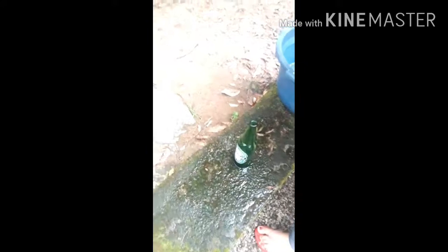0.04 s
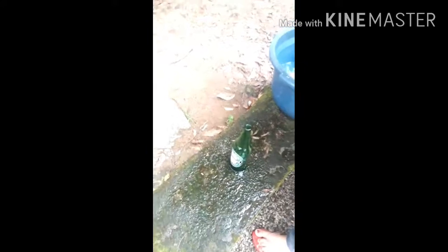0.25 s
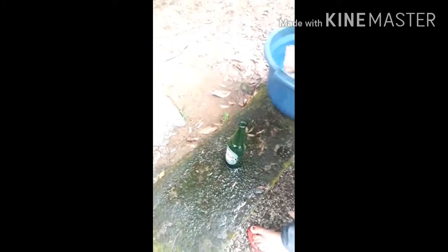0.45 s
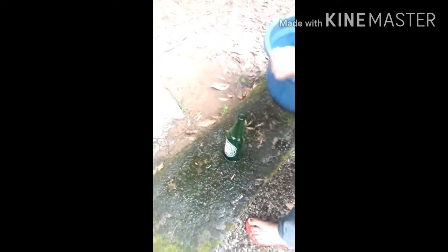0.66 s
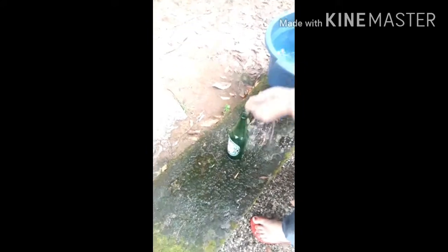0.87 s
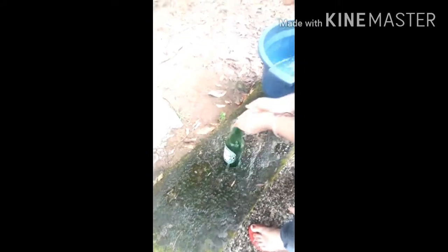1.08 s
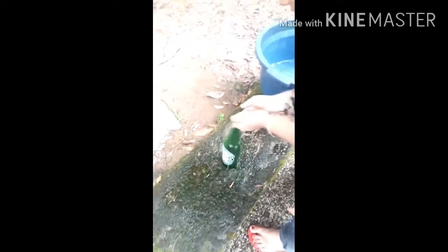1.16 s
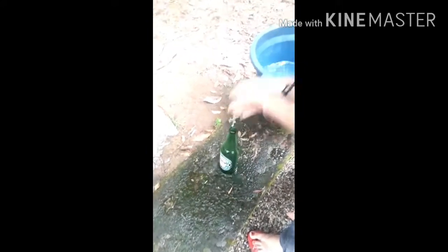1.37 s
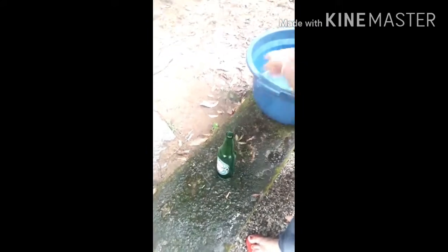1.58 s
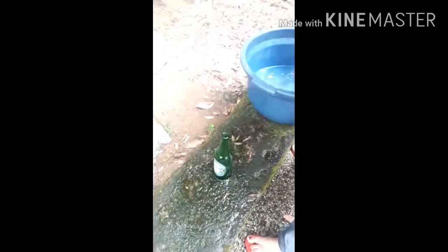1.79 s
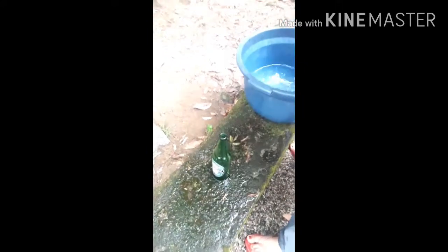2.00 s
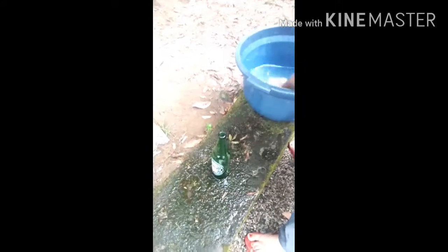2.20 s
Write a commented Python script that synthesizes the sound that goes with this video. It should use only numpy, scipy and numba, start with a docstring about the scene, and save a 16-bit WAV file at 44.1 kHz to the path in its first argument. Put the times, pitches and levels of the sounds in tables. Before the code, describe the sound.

Handfuls of water scooped from a plastic bucket and spilled in crackling splats on wet concrete

```python
"""Scooping and spilling water

Cupped hands scoop water from a plastic bucket, carry it over a bottle and let it spill on wet concrete outdoors.
Drops splat with a crack, a burst of noise for spray and rising rings; bubbles are rising, fading tones.
Sloshing and trickling are crowds of tiny rings over hiss. Behind: shaped noise for rumble, air and an insect,
a wavering low hum and a soft low swell. Both channels share one sound, with a faint flutter between them."""
import sys
import numpy as np
from scipy import signal
from scipy.fft import rfft, irfft
from scipy.io import wavfile
from scipy.ndimage import uniform_filter1d
from numba import njit

SR = 44100
rng = np.random.default_rng(int(sys.argv[2]) if len(sys.argv) > 2 else 0)


def natural_amplitude(level_db):
    """Convert a level in decibels to a linear amplitude factor, elementwise."""
    exponent = np.asarray(level_db, float) / 20
    return 10 ** exponent


def log_audio(samples):
    """Write samples as a 16-bit WAV file to the path given in sys.argv[1]."""
    # one column per channel
    frames = np.atleast_2d(samples).T
    # limit to full scale, then quantise
    limited = np.clip(frames, -1, 1)
    pcm = np.round(limited * 32767).astype(np.int16)
    wavfile.write(sys.argv[1], SR, pcm)


N = 99225  # length [samples]

# Drops bursting on the wet ground and in the bucket:
# (time [s], level [dB], centre pitch [Hz], spray fade by 60 dB [s], width [octaves], crack against level [dB])
SPLAT_DROPS = [(0.3221, -29, 8100, 0.02, 0.66, 1), (0.3428, -33, 3240, 0.0092, 2.4, -13),
               (0.4407, -36.5, 4170, 0.031, 1.8, -22), (0.516, -29, 3200, 0.016, 0.14, -12),
               (0.6229, -24, 2640, 0.018, 0.64, -19), (0.6784, -32.5, 3920, 0.016, 0.89, -29),
               (0.8, -35, 5270, 0.0062, 0.6, -2), (0.8305, -25, 7840, 0.014, 0.97, -11),
               (0.8393, -24.5, 8850, 0.014, 0.9, -16), (0.853, -31.5, 7200, 0.0097, 0.41, -12),
               (0.864, -34, 12600, 0.015, 0.6, -10), (0.8843, -27, 8040, 0.008, 0.35, -10),
               (0.868, -23, 11000, 0.016, 1.8, -12), (0.8866, -20.5, 7370, 0.011, 1.67, -17),
               (0.9062, -25, 8800, 0.013, 0.6, -0.5), (0.927, -21.5, 5300, 0.026, 1.8, -5),
               (0.969, -37, 8060, 0.0077, 1.5, -7), (0.9805, -36, 11000, 0.01, 1.5, -9),
               (0.9915, -33, 7700, 0.024, 2.9, -6), (0.998, -29, 12000, 0.015, 3.7, -12),
               (1.0177, -32, 12700, 0.013, 0.39, -8), (1.0836, -31.5, 11500, 0.008, 0.85, -2),
               (1.0943, -35, 6860, 0.0082, 0.5, -9), (1.0942, -39, 14600, 0.006, 0.25, -7),
               (1.1055, -44, 11500, 0.006, 0.8, -6), (1.123, -45, 5560, 0.016, 0.8, -14),
               (1.1295, -39, 12900, 0.007, 0.6, -6), (1.1465, -41.5, 9000, 0.014, 1, -8),
               (1.1325, -38, 6940, 0.0097, 0.49, -6), (1.1575, -46, 13500, 0.007, 0.5, -10),
               (1.1615, -34, 7560, 0.0059, 1.1, -2), (1.1757, -30.5, 8370, 0.007, 1.02, -4),
               (1.191, -40, 5900, 0.01, 1.5, -9), (1.201, -36, 11100, 0.006, 0.97, 1),
               (1.2044, -32, 8300, 0.0082, 1.1, -7), (1.2133, -23, 5300, 0.0083, 1.22, 2),
               (1.249, -22.5, 7100, 0.012, 1.2, -17), (1.256, -39, 4640, 0.0086, 1, -12),
               (1.303, -26.5, 8460, 0.014, 2.4, -15), (1.3238, -33.5, 8200, 0.013, 0.8, -18),
               (1.407, -32, 9850, 0.015, 1.15, -23), (1.436, -35, 9900, 0.013, 1.4, -11),
               (1.6675, -24.5, 6670, 0.014, 0.3, 0.5), (1.7172, -50, 8150, 0.0095, 1.2, -9),
               (1.7275, -45, 8950, 0.014, 1.6, 0), (1.736, -49, 8730, 0.013, 1.1, -9),
               (1.7442, -37.5, 10500, 0.007, 0.57, -1), (1.767, -51, 13200, 0.014, 0.28, -12),
               (1.7838, -49, 13500, 0.014, 0.4, -12), (1.8244, -27.5, 7540, 0.0074, 0.45, -9),
               (1.8385, -48, 8600, 0.01, 0.23, -12), (1.852, -44.5, 12500, 0.011, 0.7, -6),
               (1.8617, -40, 6560, 0.012, 0.9, 1), (1.9, -38.5, 8700, 0.019, 0.33, -8),
               (1.9246, -26, 8400, 0.0037, 0.29, -9), (1.953, -38, 9000, 0.025, 1.8, -12),
               (1.978, -32.5, 3200, 0.012, 0.42, -1.5), (1.984, -30.5, 9000, 0.012, 0.37, -15),
               (1.9918, -26, 8500, 0.0093, 1, 1), (2.0532, -39.5, 3680, 0.013, 2.1, -5),
               (2.1834, -45, 9000, 0.0082, 0.21, -7), (2.2315, -33, 7400, 0.017, 0.85, -21),
               (.872, -26, 4500, 0.011, 1.7, -4), (0.9516, -15.5, 5380, 0.0057, 1.34, 9),
               (0.9616, -22, 6700, 0.015, 0.51, 4.5), (1.2359, -20.5, 7500, 0.0084, 1.18, 6.5),
               (0.945, -39, 7950, 0.012, 0.44, -15), (1.2314, -24, 10900, 0.007, 0.84, -14),
               (1.266, -33, 11500, 0.012, 0.79, -10), (.615, -35, 13700, 0.01, 0.13, -20),
               (.615, -32.5, 9200, 0.022, 0.12, -22), (1.755, -39, 9900, 0.0094, 0.6, -8),
               (1.2725, -35, 13700, 0.0056, .6, -5)]
# Single bubbles closing under water:
# (time [s], level [dB], starting pitch [Hz], fade by 60 dB [s], pitch rise during the fade [share])
SINGLE_BUBBLES = [(0.125, -40, 2584, 0.033, 0.18), (.187, -38, 857, 0.072, 0.023),
                  (0.232, -33, 1453, 0.024, 0.083), (0.234, -34, 855, 0.055, 0.013),
                  (0.261, -22.5, 3296, 0.015, 0.035), (.264, -37.5, 866, 0.051, 0.066),
                  (0.308, -44, 3420, 0.11, 0.15), (.320, -36.5, 1353, 0.031, 0.071),
                  (0.348, -36, 2450, 0.021, 0.14), (.365, -44.5, 1450, 0.055, 0.051),
                  (0.459, -31.5, 3030, 0.022, 0.055), (0.462, -35.5, 1174, 0.029, 0.22),
                  (0.475, -32.5, 2604, 0.026, .03), (.522, -41.5, 925, 0.051, 0.034),
                  (.552, -39, 885, .06, 0.019), (.581, -27.5, 3000, 0.011, 0.086),
                  (0.605, -36.5, 3080, 0.022, 0.056), (0.6226, -26, 2300, 0.021, 0.39),
                  (0.8719, -27, 2970, 0.01, 0.059), (0.887, -30.5, 3000, 0.013, 0.081),
                  (0.9525, -23, 3120, 0.0126, 0.1), (1.039, -42.5, 2600, 0.013, 0.13),
                  (1.289, -27.5, 1940, 0.016, 0.65), (1.303, -32.5, 2650, 0.014, 0.18),
                  (1.773, -45.5, 5550, 0.011, 0.029), (1.874, -45.5, 3200, 0.0131, 0.09),
                  (1.91, -50, 1067, 0.053, 0.089), (1.932, -36.5, 1012, 0.035, 0.092),
                  (1.964, -46, 3570, 0.036, .02), (1.909, -48, 914, 0.028, 0.13),
                  (1.977, -38, 614, 0.07, 0.01), (2.03, -39.5, 3350, 0.019, 0.084),
                  (2.042, -39.5, 2880, .015, 0.78), (2.041, -51, 780, 0.04, 0.088),
                  (2.062, -54.5, 640, 0.074, 0.056), (2.051, -34.5, 3850, 0.019, 0.059),
                  (2.176, -50.5, 4100, 0.018, 0.072), (2.178, -54, 2010, 0.03, 0.028)]
# Four sizes of tiny ring in the flowing water, from gurgle to fine spray:
# (lowest pitch [Hz], highest pitch [Hz], rate [per s], ring length [2.3 cycles], loudness scatter [dB], trim [dB])
FLOW_GRAINS = [(229, 610, 150, 8.2, -1, -18), (640, 2310, 600, 13.7, 4, -3),
               (2345, 4620, 1200, 9.6, 3.5, -5), (4500, 14500, 3500, 14.4, 5, -2)]
# Sloshing in the bucket, in several stretches:
# (time [s], large bubbles [dB], small bubbles [dB], fine spray [dB])
SLOSH_LEVELS = [
    [(0.0, -56, -49, -56.5), (0.092, -69, -61, -67), (0.244, -51.5, -43.5, -51), (0.266, -59.5, -43.5, -49),
     (0.292, -50.5, -48.5, -58), (0.326, -48, -43.5, -46.5), (0.41, -50, -50.5, -50.5)],
    [(0.432, -53, -57, -53.5), (0.445, -54.5, -45, -45), (0.47, -42, -42.5, -49), (0.564, -51, -45, -49.5),
     (0.612, -52, -48, -50), (0.656, -59.5, -53.5, -55), (0.69, -58, -51, -60), (0.76, -78.5, -63, -66.5)],
    [(1.84, -81, -103, -76), (1.882, -84, -61, -53.5), (1.932, -56, -53, -58.5), (1.962, -53, -66, -61.5),
     (1.982, -46.5, -45, -51), (2.02, -70, -54, -50), (2.044, -62, -54, -58.5), (2.144, -69.5, -71, -80),
     (2.21, -66, -70, -77)],
    [(2.222, -55, -70, -76), (2.232, -62.5, -44.5, -57), (2.25, -47, -44, -52)],
]
# Trickling on the ground: (time [s], large bubbles [dB], small bubbles [dB], fine spray [dB])
TRICKLE_LEVELS = [(0.8, -73.5, -62, -64.5), (0.924, -71, -49, -51), (1.02, -77, -55.5, -56.5),
                  (1.104, -71, -67.5, -61), (1.216, -76, -57.5, -63), (1.284, -66.5, -46.5, -50),
                  (1.396, -73.5, -61, -61), (1.466, -91, -71.5, -71), (1.648, -80, -75, -78),
                  (1.756, -77.5, -72, -66.5), (1.82, -87, -87, -77)]
# Tone colour of rumble and air hiss: (frequency [Hz], relative level [dB])
AIR_COLOUR = [(45, -36), (65, -3), (135, 1.5), (280, -9.5), (480, -27), (1000, -30.5), (3500, -31),
              (7500, -23), (9300, -21), (10500, -35.5), (16000, -37)]
# Slow change in the hum: (time [s], level change [dB])
HUM_CHANGE = [(0, -9.5), (.95, 4.5), (2.25, -3.5)]
# Soft low swells far off: (time [s], level [dB], starting pitch [Hz], fade by 60 dB [s])
FAR_SWELLS = [(1.359, -51, 182.4, 0.22)]
# Loudness of the insect: (time [s], level [dB])
INSECT_LEVEL = [(0, -74), (1.4, -120), (1.5, -99), (1.56, -68.5), (1.64, -73.5), (1.799, -89), (2.25, -88)]

SPLAT_DELAY_S = 0.0008  # spray and ring start this long after the splat's listed time
SKIRT_HZ = 2600  # splats thin out below this pitch
GLIDE = 0.12  # pitch rise of flow grains and droplets [share]


@njit
def ring(out, start, hz, t60, size, rise, attack):
    """Damped sines, like small resonances, that climb in pitch as they fade."""
    for k in range(len(start)):
        length = int(t60[k] * SR)
        phase = 0.
        for i in range(min(length, len(out) - start[k])):
            u = i / length
            pitch = min(hz[k] * (1 + rise[k] * u), .45 * SR)
            phase += 2 * np.pi * pitch / SR
            fade = np.exp(-6.9 * u)  # 60 dB down at the end
            swell = 1 - np.exp(-i / (attack[k] * SR))
            out[start[k] + i] += size[k] * np.sin(phase) * fade * swell
    return out


def rings(t, hz, t60, size, rise, attack):
    """Adds many damped, climbing tones into a fresh track."""
    rise = np.zeros(len(t)) + rise
    attack = np.zeros(len(t)) + attack
    start = (t * SR).astype(np.int64)
    return ring(np.zeros(N), start, hz, t60 + 1e-4, size, rise, attack + 1e-5)


def unit(x):
    """Scales a sound to an average (rms) strength of 1."""
    return x / np.sqrt(np.mean(x ** 2))


def shaped(n, gain):
    """Noise coloured by a gain for each frequency, with rms 1."""
    f = np.arange(n // 2 + 1) * SR / n + 1
    return unit(irfft(rfft(rng.standard_normal(n)) * gain(f), n))


def walk(rate):
    """Random wander: rate new levels per second, smoothed twice."""
    hold = int(SR / rate)
    steps = np.repeat(rng.standard_normal(N // hold + 1), hold)
    return 2.07 * uniform_filter1d(uniform_filter1d(steps, hold), hold)[:N]


def cracks_and_spray():
    """A sharp pressure pulse, then lumpy noise that dies away with a faint longer patter."""
    size = 4096
    clock = np.arange(size) / SR
    t = np.maximum(clock - SPLAT_DELAY_S, 0)
    f = np.arange(size // 2 + 1) * SR / size + 1
    attack = np.minimum(t / .0005, 1)
    patter_fade = natural_amplitude(-22 - 60 * t / 0.056)
    out = np.zeros(N + size)
    for s, db, hz, t60, octaves, crack_db in SPLAT_DROPS:
        def colour(f):
            """A band around the splat's pitch on a weak wide skirt that thins out in the bass."""
            band = np.exp(-2 * (np.log2(f / hz) / octaves) ** 2)
            return (band + natural_amplitude(-24)) / (1 + (SKIRT_HZ / f) ** 4)

        # a pulse centred at 1 ms and about a millisecond long
        pulse = irfft(1j * colour(f) * np.exp(-2j * np.pi * f * .001), size)
        crack = pulse * np.exp(-2 * (clock * 1000 - 1) ** 2)
        crack = natural_amplitude(crack_db) * crack / np.max(crack)
        lumps = np.repeat(rng.standard_normal(size // 32), 32)
        lumpy = natural_amplitude(5 * uniform_filter1d(lumps, 24))
        spray_fade = natural_amplitude(-11 - 60 * t / max(t60, 3e-4))
        spray = lumpy * shaped(size, colour) * (spray_fade + patter_fade)
        i = int(s * SR)
        out[i:i + size] += natural_amplitude(db) * (spray * attack + crack)
    return out[:N]


def droplets():
    """Ten small rings follow each splat, scattered around its pitch; later ones are weaker."""
    s, db, hz, t60, octaves, _ = np.array(SPLAT_DROPS).T[:, :, None]
    late = rng.exponential(size=(len(s), 10)) * t60 / 5
    off = rng.standard_normal((len(s), 10))
    pitch = np.clip(hz * 2 ** (off * octaves / 2), SKIRT_HZ, 15000).ravel()
    level = natural_amplitude(db - 7 - 30 * late / t60).ravel()
    return rings((s + late + 0.001001).ravel(), pitch, 13 / pitch, level, GLIDE, 1 / pitch)


def splat_rings():
    """One short rising ring just below the pitch of each splat."""
    s, db, hz = np.array(SPLAT_DROPS).T[:3]
    t60 = np.full(len(s), .006)
    return rings(s + SPLAT_DELAY_S, hz * .9, t60, natural_amplitude(db - 7), .22, .0006)


def bubbles():
    """Each bubble swells, fades and climbs, roughened by three weaker neighbours."""
    s, db, hz, t60, rise = np.array(SINGLE_BUBBLES).T
    attack = 0.14 * t60
    out = rings(s, hz, t60, 2 * natural_amplitude(db), rise, attack)
    for _ in range(3):
        start = s + .3 * t60 * rng.random(len(s))
        pitch = hz * 2 ** (0.11 * rng.standard_normal(len(s)))
        out = out + rings(start, pitch, 1.12 * t60, 2 * natural_amplitude(db - 11), rise, attack)
    return out


def flow():
    """Crowds of random bubble rings in four sizes, a few much louder, coming in shared surges."""
    t = np.arange(N) / SR
    levels = np.vstack(SLOSH_LEVELS + [TRICKLE_LEVELS])
    levels = levels[np.argsort(levels[:, 0], kind="stable")]
    surge = walk(29.22)
    out = 0
    # the gurgle shares the level column of the large bubbles
    for column, grain in zip((1, 1, 2, 3), FLOW_GRAINS):
        low, high, rate, cycles, scatter_db, trim_db = grain
        u = rng.random((16000, 5))
        u = u[u[:, 4] < rate * N / SR / len(u)]
        hz = low * (high / low) ** u[:, 1]
        t60 = 2.3 * cycles / hz * (.5 + u[:, 2])
        size = natural_amplitude(-scatter_db * np.log(0.08 + u[:, 3]))
        crowd = rings(u[:, 0] * N / SR, hz, t60, size, GLIDE, 0.34 / hz)
        # smooth hiss under the crowd
        wash = shaped(N, lambda f: 1 / (1 + (low / f) ** 6) / (1 + (f / high) ** 6))
        unsteady = natural_amplitude(1.46 * surge + 1.2 * walk(44.92))
        layer = unit((unit(crowd) + natural_amplitude(-9) * wash) * unsteady)
        out = out + layer * natural_amplitude(np.interp(t, levels[:, 0], levels[:, column]) + trim_db)
    return out


def hum():
    """A low sine near 45 Hz whose pitch and level wander."""
    t = np.arange(N) / SR
    pitch = 45 + 0.84 * walk(2.6)
    tone = np.sqrt(2) * np.sin(2 * np.pi * np.cumsum(pitch) / SR)
    change = np.interp(t, *np.array(HUM_CHANGE).T)
    return tone * natural_amplitude(-70 + change + 1.04 * walk(1.74))


def open_air():
    """Rumble and hiss: noise with a fixed colour whose level flickers slightly."""
    hz, db = np.array(AIR_COLOUR).T
    noise = shaped(N, lambda f: natural_amplitude(np.interp(np.log(f), np.log(hz), db)))
    return noise * natural_amplitude(-62.5 + .8 * walk(8.63))


def far_swells():
    """Soft low tones that swell, fade and rise slightly."""
    s, db, hz, t60 = np.array(FAR_SWELLS).T
    return rings(s, hz, t60, 2 * natural_amplitude(db), 0.031, 0.15 * t60)


def insect():
    """A thin band of noise around 6390 Hz that comes and goes."""
    band = shaped(N, lambda f: 1 / (1 + ((f - 6390) / 120) ** 2))
    return band * natural_amplitude(np.interp(np.arange(N) / SR, *np.array(INSECT_LEVEL).T))


def scene():
    """Adds all sources; the channels differ only by a faint flutter, with some extra treble in it."""
    water = cracks_and_spray() + droplets() + splat_rings() + bubbles() + flow()
    mono = water + hum() + open_air() + far_swells() + insect()
    treble = np.diff(mono, n=2, prepend=[0, 0])
    side = natural_amplitude(-36.5) * (mono + natural_amplitude(-7) * treble) * walk(1000)
    return np.array([mono + side, mono - side])


def roll_off(x):
    """The treble ends steeply here."""
    return signal.sosfilt(signal.butter(12, 16600, fs=SR, output="sos"), x)


def record(dry):
    """The microphone loses the very top: 24 dB down over 300 Hz, from 15600 Hz."""
    f = np.arange(N // 2 + 1) * SR / N
    top_loss = natural_amplitude(-24 * np.clip((f - 15600) / 300, 0, 1))
    mix = irfft(rfft(dry) * top_loss, N)
    return roll_off(mix)


dry = scene()
out = record(dry)
log_audio(out)
```